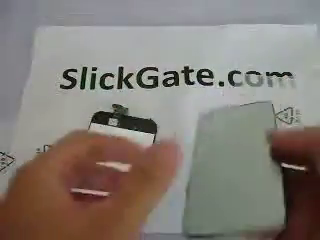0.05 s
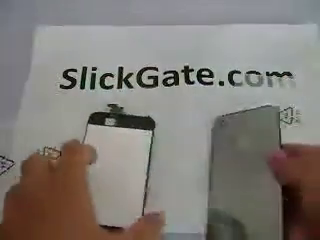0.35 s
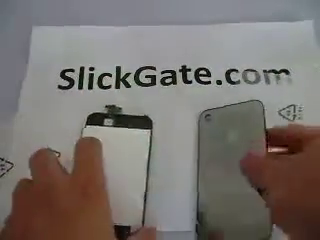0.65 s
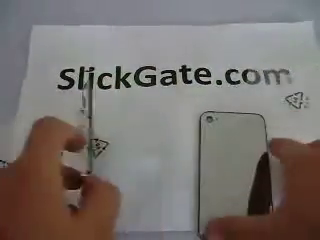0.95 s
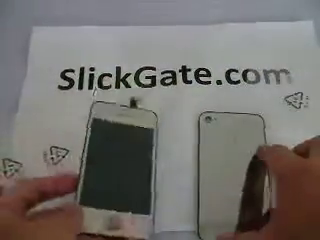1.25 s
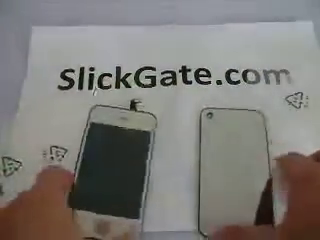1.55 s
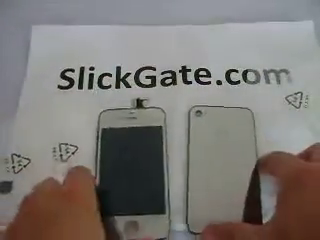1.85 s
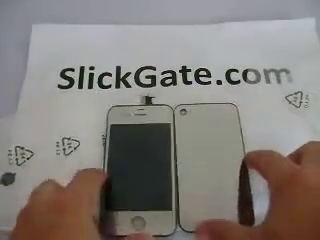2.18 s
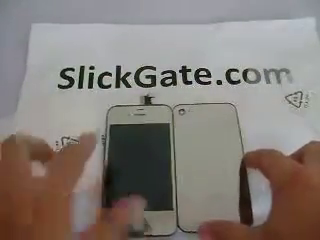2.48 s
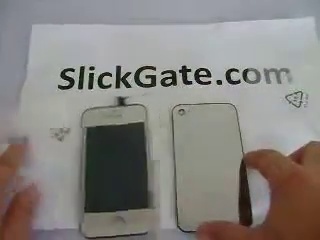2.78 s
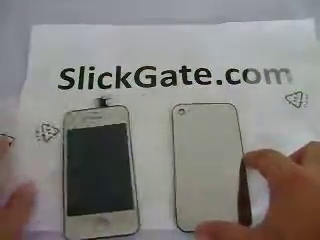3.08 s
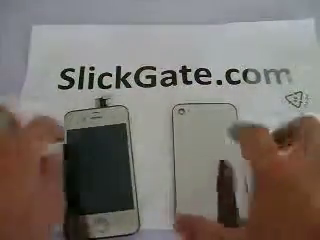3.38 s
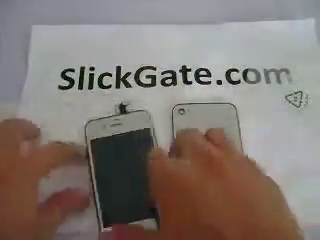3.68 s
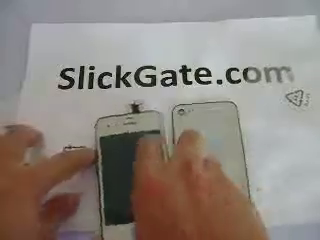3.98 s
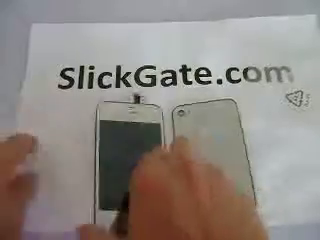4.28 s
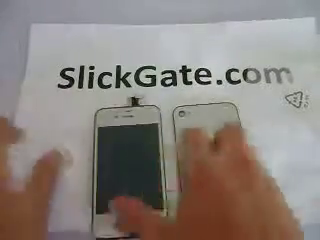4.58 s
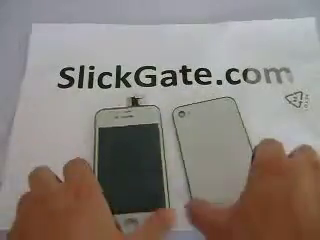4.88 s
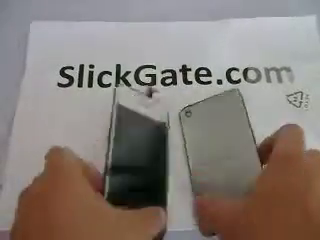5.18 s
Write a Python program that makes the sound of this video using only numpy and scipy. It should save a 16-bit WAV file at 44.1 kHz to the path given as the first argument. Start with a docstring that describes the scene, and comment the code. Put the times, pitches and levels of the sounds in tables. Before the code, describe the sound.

A phone's glass back and screen are handled on a paper-covered table in a small room. After a few light ticks, one panel claps down sharply, close to the microphone, with a brief rattle and ring. Two softer landings follow, then scattered taps and short rasps as the parts slide over the paper. Another firm clack comes near the end, and a brief scrape. Steady hiss and a faint fan lie underneath.

```python
"""A phone's glass back and screen are handled on a paper-covered table in a small room with hiss and a fan.
A thin whistle fades, light touches tick, and at 0.8 s a panel claps down hard enough to overload the
microphone. Two softer landings follow. Each contact rattles and has a short ring; firm ones also
knock the table. From about 2 s the parts mostly tap and rasp over the paper. A last landing comes at
4.5 s, and near 5.2 s a panel judders as it is lifted."""
import sys
import numpy as np
from scipy import signal
from scipy.fft import rfft, irfft
from scipy.io import wavfile
from scipy.ndimage import uniform_filter1d

SR = 44100
rng = np.random.default_rng(int(sys.argv[2]) if len(sys.argv) > 2 else 0)


def wav_out(sig):
    """Save sig, one row per channel (or a flat mono array), as 16-bit PCM at SR to the path in sys.argv[1]."""
    wavfile.write(sys.argv[1], SR, np.round(np.clip(np.atleast_2d(sig).T, -1, 1) * 32767).astype(np.int16))


N = 239948
TIME = np.arange(N) / SR
RING_TIME = TIME[:SR // 5]  # one contact may ring for 0.2 s

# Fixed resonances that colour every tap and slide with a short ring.
# (pitch [Hz], fade time [s], level [dB]); "fade time" and t60 mean the time to drop by 60 dB
RESONANCES = [(840, .06, -6), (1437, .09, -6), (1505, .08, -3), (1582, .09, -7), (1776, .07, -10),
              (2025, .05, -7), (2430, .06, -4), (2690, .07, -5), (2905, .06, 1), (3420, .06, -4),
              (3590, .05, -2), (3850, .06, -6), (4060, .04, -10), (4925, .05, -8)]
RING_DB = -10  # that ring compared with the touch that starts it


def landings(corner_s=.003, hops=3, hop_shrink=.85, hop_loss_db=-6, damped_db=-14):
    """A panel is laid down: one edge touches, the face claps down with a short ring, then it hops to rest."""
    # Each landing; levels after the first are compared with the clap.
    # (time [s], clap level [dB], pitch [Hz], width [octaves], rattle fade time [s], table knock [dB],
    #  ring [dB], edge's head start [s], edge [dB], far corner [dB], first hop [s], hop level [dB])
    claps = [ (0.8175, -13, 2880, 0.47, 0.018, -11.5, -1, 0.017, -16, -0.5, .0245, -15),
             (1.227, -27, 4180, 0.3, .013, -19.5, -11, 0.0029, -5, -23, 0.013, -28.5),
             (1.7611, -29, 3400, 0.86, 0.018, -3, -10, .007, -10.5, -11, .0235, -5.5),
             (4.4681, -21, 2720, 0.71, 0.017, -6.5, -14, 0.0037, -18, -10.5, .0232, -11)]
    out = np.zeros(N)
    for s, db, hz, octaves, t60, knock_db, ring_db, lead_s, edge_db, corner_db, hop_s, hop_db in claps:
        # a blow on one edge sounds lower and broader than the clap
        edge = dict(hz=0.72 * hz, octaves=1.05, t60=0.041, knock_db=-5.5)
        # a flat clap favours the lower resonances
        clap_ring = unit(through(ring(RESONANCES), contact(hz=1670, octaves=1.36)))
        add(out, s - lead_s, strike(db + edge_db, **edge))
        add(out, s, strike(db, hz, octaves, t60, knock_db, damped_db))
        add(out, s + corner_s, strike(db + corner_db, hz, octaves, t60, damped_db, damped_db))
        add(out, s + corner_s, blow_gain(db + ring_db) * clap_ring)
        hop_delays = np.cumsum(hop_s * hop_shrink ** np.arange(hops))
        for k, delay in enumerate(hop_delays):
            add(out, s + delay, strike(db + hop_db + k * hop_loss_db, **edge))
    return out


def taps():
    """Fingers and parts touch lightly, one small blow each time."""
    # Each touch; the table knock is compared with the touch itself.
    # (time [s], level [dB], pitch [Hz], width [octaves], rattle fade time [s], table knock [dB])
    touches = [ (0.4452, -40.5, 1100, 0.19, .015, -1), (0.456, -43, 3600, .5, .015, -21.5),
               (0.6692, -33, 1800, 0.95, .018, -7), (0.6982, -41.5, 1500, 1.32, .015, -5),
               (0.735, -34, 3430, 0.47, .008, -21.5), (1.349, -44, 2000, 1, 0.017, -7),
               (1.4295, -40.5, 2170, 0.15, 0.013, -20.5), (1.943, -42.5, 2594, 0.23, .007, -16.5),
               (2.176, -34.5, 2790, 0.25, 0.021, -12), (2.7572, -32, 3100, 0.77, 0.0087, -15),
               (2.852, -34.5, 3130, 0.36, 0.021, -14.5), (2.9856, -45.5, 3640, .7, 0.0079, -22),
               (3.0763, -35.5, 3130, 0.5, 0.013, -13), (3.085, -37.5, 3300, 0.6, .02, -16),
               (3.7008, -30.5, 3080, 0.58, 0.015, -9.5), (4.107, -41, 4030, 0.35, .006, -14),
               (4.1461, -31, 2740, 0.26, 0.051, -20), (4.2484, -39, 4620, 0.87, 0.013, -11.5),
               (4.789, -38.5, 2210, 0.98, .022, -6), (4.831, -38.5, 1227, 0.22, 0.018, -3),
               (4.879, -43, 2530, 0.66, .03, -15), (5.165, -37.5, 2300, 0.76, 0.044, -0.5),
               (5.342, -39.5, 4780, .77, .015, -6.5)]
    out = np.zeros(N)
    for s, db, hz, octaves, t60, knock_db in touches:
        add(out, s, strike(db, hz, octaves, t60, knock_db))
    return out


def strike(db, hz, octaves, t60, knock_db, ring_db=RING_DB):
    """One contact rattles briefly, then the fixed resonances and the table ring on."""
    colour = contact(hz, octaves)
    blow = unit(mic_response(through(rattle(t60), colour)))
    ringing = unit(through(ring(RESONANCES), colour))
    return blow_gain(db) * (blow + undb(ring_db) * ringing + undb(knock_db) * table_knock())


def rattle(t60, bounce_db=7):
    """A tick and the many tiny bounces after it, about equally strong at every pitch."""
    half_fade = fade(RING_TIME, 2 * t60)  # applied twice, so the bounces die in about t60
    bounces = undb(bounce_db) * unit(rng.standard_normal(len(RING_TIME)) * half_fade)
    spectrum = rfft(signal.unit_impulse(len(RING_TIME)) + bounces)
    return irfft(spectrum / np.abs(spectrum), len(RING_TIME)) * half_fade


def table_knock(thud_t60=0.11, thud_db=-4):
    """The struck table top gives a few low notes and a dull thud with no clear pitch."""
    # The notes of the table top: (pitch [Hz], fade time [s], level [dB])
    table_notes = [(156, 0.085, -9.5), (229, 0.19, -3.5), (303, 0.028, 2.5), (357, .08, 0.5),
                   (666, 0.4, -4.5), (834, 0.023, 8.5), (925, 0.008, 4)]
    burst = rng.standard_normal(len(RING_TIME)) * fade(RING_TIME, thud_t60)
    thud = unit(through(burst, contact(hz=263.5, octaves=2.24)))
    return unit(ring(table_notes) + undb(thud_db) * thud)


def slides(speed_up_s=.02, slow_down_s=.035):
    """Edges catch on paper fibres: a grainy, slightly ringing rasp that swells with the hand's speed."""
    # Each push over the paper: (start [s], length [s], level [dB], pitch [Hz], width [octaves])
    pushes = [ (0.438, .07, -47, 4370, .55), (0.669, .13, -47, 1800, 1.3), (1.697, 0.14, -49.5, 4750, 0.33),
              (2.131, .045, -42.5, 3080, 0.53), (2.218, .045, -46, 3750, 0.83),
              (2.653, 0.27, -41.5, 3140, 0.94), (2.792, 0.11, -45, 3100, .6),
              (2.961, .075, -50, 3560, 0.64), (3.575, 0.19, -48, 3564, .9), (3.637, 0.097, -45.5, 3100, .7),
              (3.848, .09, -51, 3800, .7), (4.034, .055, -46, 3180, 0.69), (4.123, .12, -43.5, 2640, .7),
              (4.232, 0.12, -51, 3270, .8), (5.155, .05, -38.5, 2600, 1.2), (5.237, .17, -46.5, 1817, 1.5),
              (5.274, .08, -43.5, 5190, .3)]
    out = np.zeros(N)
    noise = rng.standard_normal(N)
    catch_db = 2 * rng.exponential(size=N) + 1.5 * waver(rate=90)
    fibres = noise * undb(catch_db)
    for start, length, db, hz, octaves in pushes:
        span = slice(int(start * SR), int((start + length) * SR))
        t = TIME[span] - start
        speed = np.clip(np.minimum(t / speed_up_s, (length - t) / slow_down_s), 0, 1)
        rasp = mic_response(through(fibres[span], contact(hz, octaves, floor_db=-18)))
        add(out, start, undb(db) * np.sqrt(speed) * steady(rasp))
    ringing = steady(through(out, ring(RESONANCES))) * np.std(out)
    return out + undb(RING_DB) * ringing


def judder(start_s=5.158, rise_s=0.012, hold_s=0.02, t60=.11, db=-37):
    """Quick uneven slips keep a panel ringing for a moment as it is lifted."""
    # The notes of the slipping edge: (pitch [Hz], fade time [s], level [dB])
    edge_notes = [(797, 0.043, -9), (1620, 0.15, -1), (2310, .07, -10)]
    ringing = steady(through(rng.standard_normal(N), ring(edge_notes)))
    t = TIME - start_s
    rise = np.clip(t / rise_s, 0, 1)
    release = fade(np.maximum(t - rise_s - hold_s, 0), t60)
    return undb(db) * ringing * rise * release


def room(x, gap_s=0.0019, near_db=-11, near_t60=0.028, tail_db=-9, tail_t60=0.43, dull_hz=4500):
    """Quick echoes off hands and table and the longer tail of a small room, both slightly dulled."""
    t = TIME[:SR * 3 // 4]
    echoes = rng.standard_normal((2, len(t))) * np.clip(t / gap_s - 1, 0, 1)
    tail = undb(tail_db) * unit(echoes[0] * fade(t, tail_t60))
    near = undb(near_db) * unit(echoes[1] * fade(t, near_t60))
    return through(x, signal.lfilter(*signal.butter(1, dull_hz, fs=SR), near + tail))


def hiss(level_db=-46, flicker_db=0.37):
    """An even background hiss whose level wavers slightly."""
    # How strong the hiss is from bass to treble: (frequency [Hz], relative level [dB])
    hiss_shape = [(12, -22), (25, -4), (60, 0), (90, 1.5), (140, -2), (180, -3.5), (300, -1), (480, -4),
                  (750, -1), (1500, -3.5), (2500, -2.5), (3700, -7), (4600, -7), (6000, -9)]
    hz, db = np.transpose(hiss_shape)
    f = np.maximum(np.arange(N // 2 + 1) * SR / N, 1)
    gain = undb(np.interp(np.log(f), np.log(hz), db))
    noise = irfft(rfft(rng.standard_normal(N)) * gain, N)
    return steady(mic_response(noise)) * undb(level_db + flicker_db * waver(rate=14))


def fan(trim_db=-1):
    """A faint fan: a low hum and a whine that swell and sink, with weaker tones that stay on."""
    # How loud the hum is, before trim_db: (time [s], level [dB])
    hum_levels = [(0.0, -55), (0.98, -73.5), (1.27, -51), (1.41, -55.5), (1.67, -49.5), (1.73, -68),
                  (2.62, -52), (2.67, -64), (2.91, -49), (4.0, -67.5), (4.18, -52), (5.44, -66.5)]
    # How loud the whine is, before trim_db: (time [s], level [dB])
    whine_levels = [(0, -63), (2.3, -56.5), (2.8, -60), (3.6, -61), (4.3, -49.5), (4.7, -59.5), (5.1, -75)]
    # The fan's weaker tones: (pitch [Hz], level [dB])
    weak_tones = [(132, -63), (295, -65.5), (1125, -63), (1520, -62.5), (3115, -64)]
    hum = tone(57, wander_hz=4, rate=14, waver_db=2.5) * undb(trim_db + curve(hum_levels))
    whine = tone(781, wander_hz=2.5, rate=20, waver_db=2.5) * undb(trim_db + curve(whine_levels))
    weak = sum(undb(db) * tone(hz, wander_hz=0.0062 * hz, rate=30, waver_db=3) for hz, db in weak_tones)
    return hum + whine + weak


def whistle(db=-54.5, hold_s=0.34, t60=.35):
    """A thin whistle that is there at first and dies away."""
    release = fade(np.maximum(TIME - hold_s, 0), t60)
    return undb(db) * tone(2580, wander_hz=51.3, rate=83, waver_db=1.5) * release


def contact(hz, octaves, size=1024, floor_db=-26):
    """The click of one contact, strongest around hz; a harder, smaller touch sounds higher."""
    f = np.maximum(np.arange(size // 2 + 1) * SR / size, 1)
    hump = np.exp(-.5 * (np.log2(f / hz) / octaves) ** 2)
    floor = undb(floor_db) * np.minimum(f / hz, 1) ** .5
    # keep that tone colour but pack the energy at the very start (minimum phase)
    cepstrum = irfft(np.log(hump + floor))
    cepstrum[1:size // 2] *= 2
    cepstrum[size // 2 + 1:] = 0
    return irfft(np.exp(rfft(cepstrum)))


def ring(notes):
    """A set of fading notes; the level of each varies by about a decibel from blow to blow."""
    shares_db = rng.standard_normal(len(notes))
    return unit(sum(undb(db + share) * unit(np.cos(2 * np.pi * hz * RING_TIME) * fade(RING_TIME, t60))
                    for (hz, t60, db), share in zip(notes, shares_db)))


def tone(hz, wander_hz, rate, waver_db):
    """A pure tone that wanders in pitch and level."""
    phase = 2 * np.pi * np.cumsum(hz + wander_hz * waver(rate)) / SR
    return steady(np.sin(phase) * undb(waver_db * waver(rate)))


def waver(rate):
    """A smooth random wobble of typical size one that heads for a new value rate times a second."""
    step = int(SR / rate)
    stairs = np.repeat(rng.standard_normal(N // step + 1), step)
    return steady(uniform_filter1d(uniform_filter1d(stairs, step), step)[:N])


def mic_response(x, ripple_db=0.97, top_hz=5194):
    """The microphone hears some pitches slightly better than others and loses the high treble."""
    return signal.sosfilt(signal.cheby1(6, ripple_db, top_hz, fs=SR, output="sos"), x)


def undb(db):
    """Turn decibels into a number to multiply by."""
    return 10 ** (np.asarray(db) / 20)


def blow_gain(db):
    """The gain that gives a blow of energy one as much energy as 10 ms of sound at this level."""
    return undb(db) * np.sqrt(SR / 100)


def unit(x):
    """Scale to a total energy of one."""
    return x / np.sqrt(np.sum(x ** 2) + 1e-18)


def steady(x):
    """Scale to an average power of one."""
    return unit(x) * np.sqrt(len(x))


def curve(rows):
    """Join (time [s], value) points with straight lines."""
    return np.interp(TIME, *np.transpose(rows))


def fade(t, t60):
    """Die away by 60 dB every t60 seconds."""
    return np.exp(-np.log(1000) * t / t60)


def add(out, s, x):
    """Mix x into out, starting at s seconds."""
    i = max(int(s * SR), 0)
    out[i:i + len(x)] += x[:max(N - i, 0)]


def through(x, response):
    """Pass a sound through something, given how that thing answers a single click."""
    return signal.fftconvolve(x, response)[:len(x)]


def scene(bass_cut_hz=130):
    """The handled parts in their room, over the background; such small panels give off no deep bass."""
    bass_cut = signal.butter(2, bass_cut_hz, "high", fs=SR, output="sos")
    parts = signal.sosfilt(bass_cut, landings() + taps() + slides() + judder())
    return (parts + room(parts) + hiss() + fan() + whistle())[None]


def record(dry):
    """The microphone rounds big swings and cuts the treble; only clipping after that adds high treble."""
    soft_limit, hard_limit = 0.98, 0.64
    band_hz, top_hz = 6050, 15600
    rounded = soft_limit * np.tanh(dry / soft_limit)
    narrow = signal.sosfilt(signal.ellip(10, .3, 75, band_hz, fs=SR, output="sos"), rounded)
    clipped = np.clip(narrow, -hard_limit, hard_limit)
    return signal.sosfilt(signal.ellip(8, .2, 70, top_hz, fs=SR, output="sos"), clipped)


dry = scene()
out = record(dry)
wav_out(out)
```